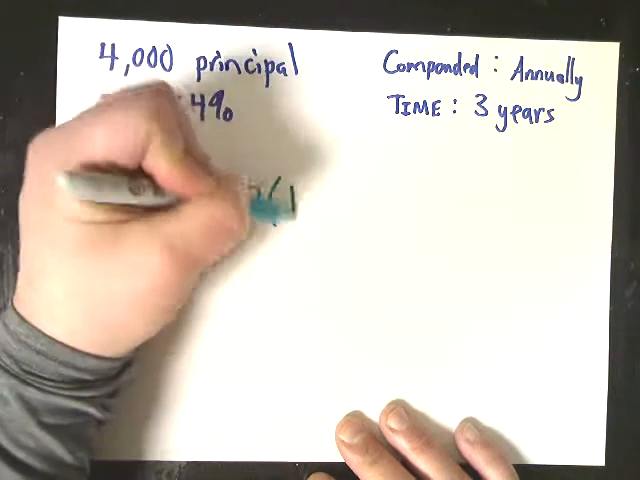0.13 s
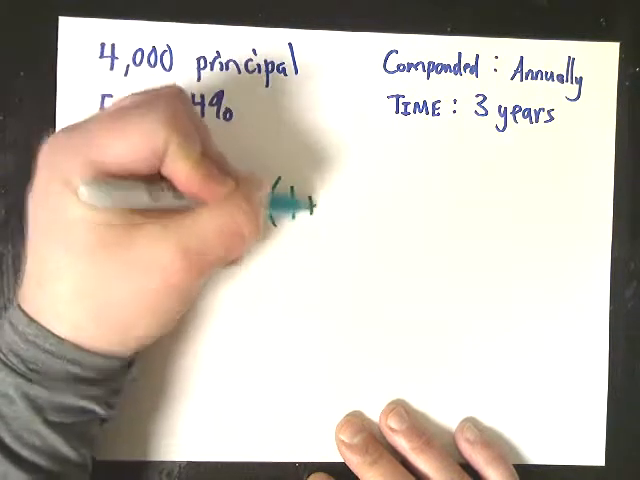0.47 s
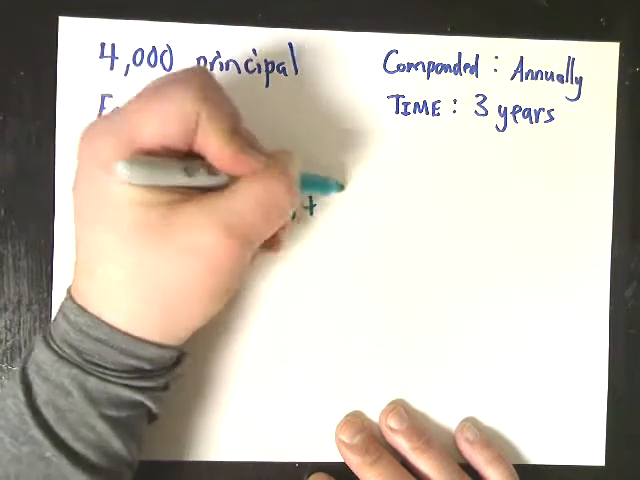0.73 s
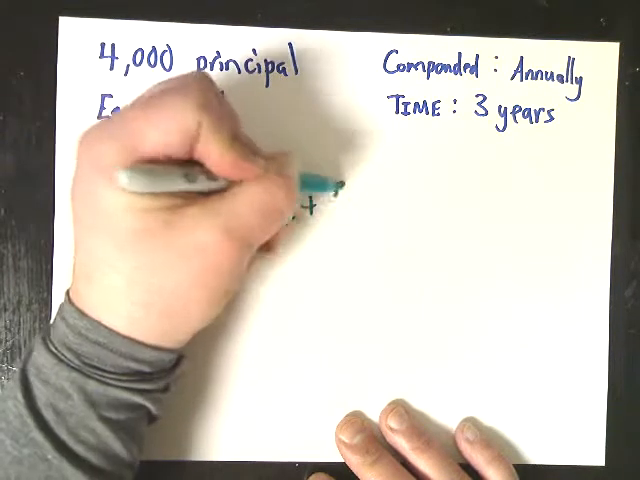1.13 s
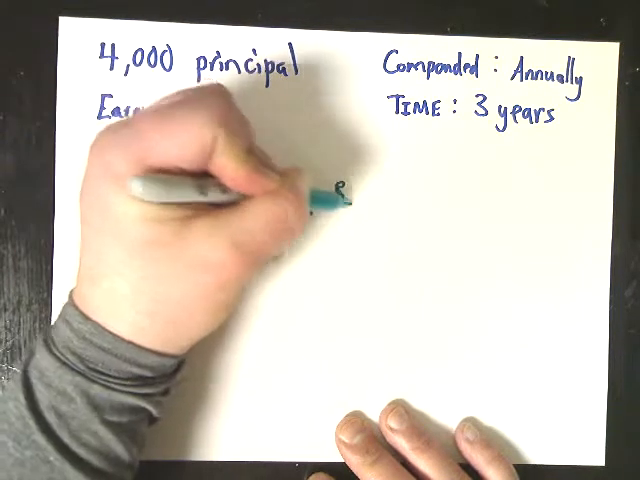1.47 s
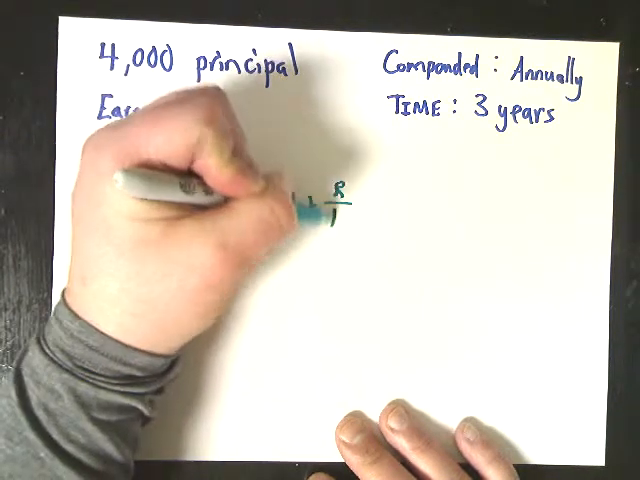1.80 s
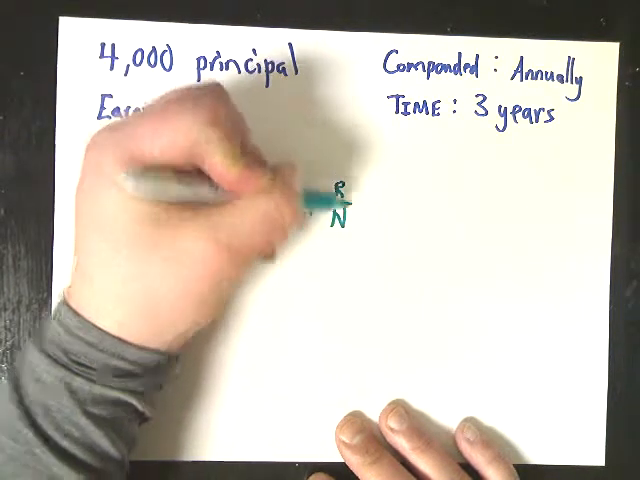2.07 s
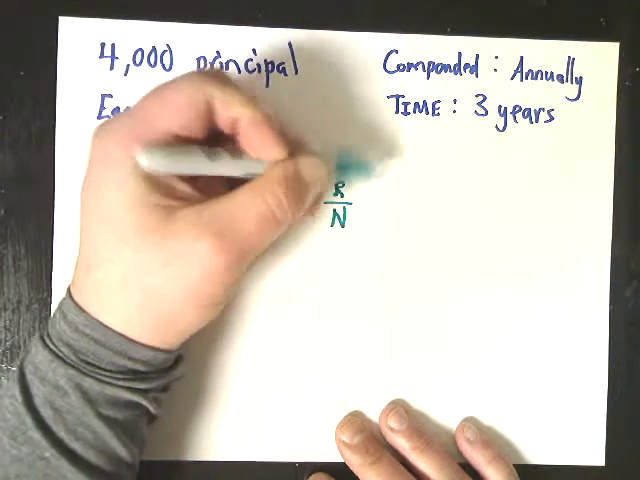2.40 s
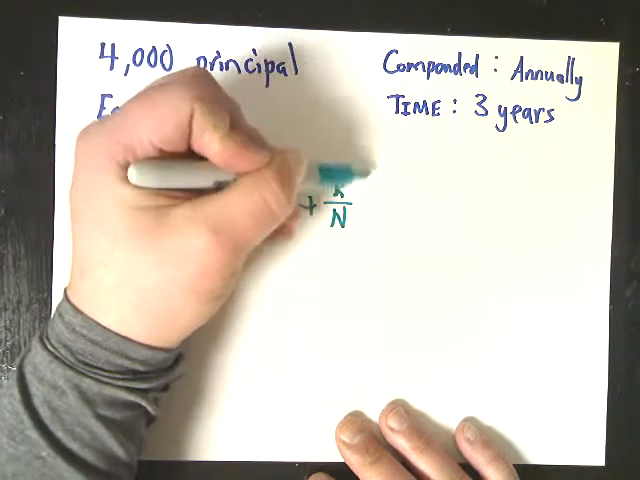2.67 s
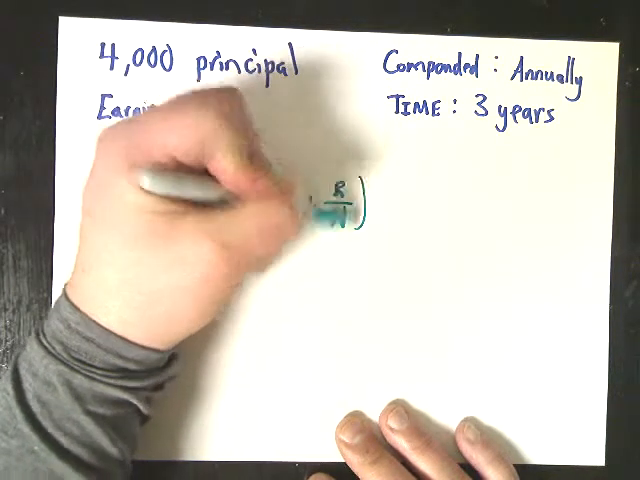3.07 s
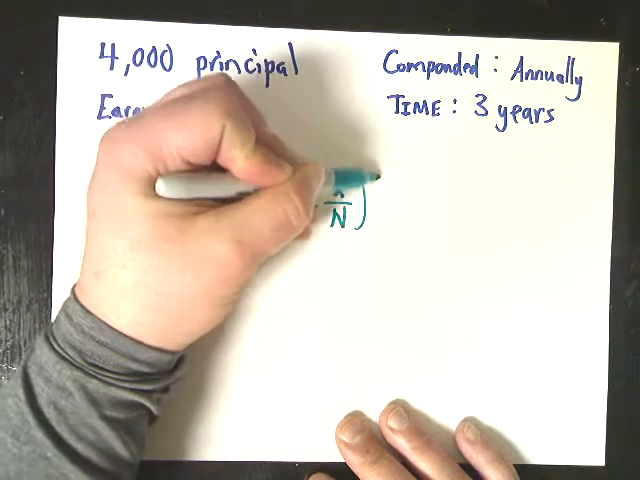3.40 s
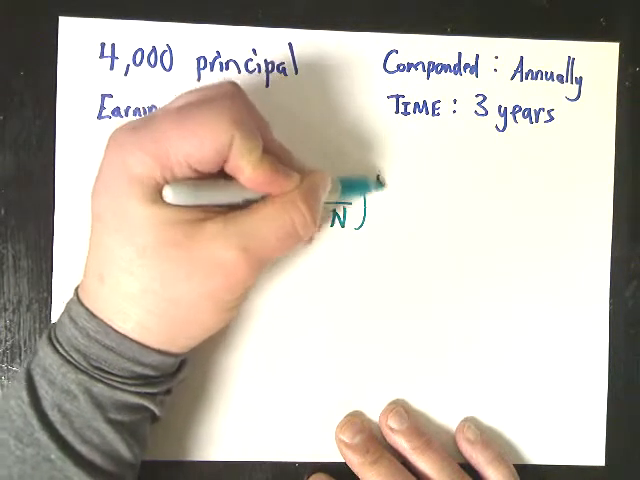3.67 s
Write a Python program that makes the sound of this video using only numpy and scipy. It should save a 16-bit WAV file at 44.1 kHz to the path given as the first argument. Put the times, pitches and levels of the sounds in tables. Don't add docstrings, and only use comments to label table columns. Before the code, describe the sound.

A felt marker scratches short dry strokes on paper in uneven clusters, with small tip taps, papery snaps and soft hand thuds on the desk; a quiet room, close cheap microphone, gritty hiss and faint hum throughout.

```python
import sys
import numpy as np
from scipy import signal
from scipy.fft import rfft, irfft, next_fast_len
from scipy.io import wavfile
from scipy.ndimage import map_coordinates

SR = 44100
rng = np.random.default_rng(int(sys.argv[2]) if len(sys.argv) > 2 else 0)


def unload_audio(sound):
    columns = np.transpose(np.atleast_2d(sound))
    steps = np.round(np.clip(columns, -1, 1) * 32767)
    wavfile.write(sys.argv[1], SR, steps.astype(np.int16))


def volts_from_decibels(level):
    exponent = np.asarray(level, float) / 20
    return 10 ** exponent


N = 169785


def unit(x):
    return x / np.sqrt(np.mean(x ** 2) + 1e-20)


def wobble(rate_hz):
    knots = rng.standard_normal(int(N * rate_hz / SR) + 4)
    return map_coordinates(knots, [np.arange(N) * rate_hz / SR])


def filtered(x, response):
    m = next_fast_len(len(x) + 8192)
    return irfft(rfft(x, m) * response(np.fft.rfftfreq(m, 1 / SR)), m)[:len(x)]


def colour(points):
    hz_points, db = np.transpose(points)
    return lambda hz: volts_from_decibels(np.interp(np.log(hz + 1), np.log(hz_points + 1), db, left=-120))


def coloured_noise(points):
    return unit(filtered(rng.standard_normal(N), colour(points)))


def level_curve(points):
    return np.interp(np.arange(N) / SR, *np.transpose(points))


def resonant(peaks, shift_db):
    def response(f):
        total = 0
        for k, (hz, width_hz, db) in enumerate(peaks):
            damping = 1j * f * width_hz
            total = total + (-1) ** k * volts_from_decibels(db + shift_db[k]) * damping / (hz * hz - f * f + damping)
        return total
    return response


def ring(modes, attack_s):
    t = np.arange(SR // 2) / SR
    total = np.zeros(len(t))
    for hz, db, t60_s in modes:
        total -= volts_from_decibels(db - 60 * t / t60_s) * np.sin(2 * np.pi * hz * t)
    return total * (1 - np.exp(-t / attack_s))


def add(track, s, sound):
    track[round((s + 1) * SR):][:len(sound)] += sound


def felt_on_fibres(count):
    fibres_per_s, fibre_db, clump_db = 11000, 1.8, 1.2
    caught = rng.random(count) < fibres_per_s / SR
    strength = rng.standard_normal(count) * volts_from_decibels(fibre_db * rng.exponential(size=count))
    return unit(caught * strength * volts_from_decibels(clump_db * wobble(300)[:count]))


def stroke_speed(t, length_s, rise):
    edge_power, drag_db, drag_s = 1.3, -18, 0.032
    u, top = t / length_s, np.clip(rise, .05, .95)
    ramp = np.clip(np.minimum(u / top, (1 - u) / (1 - top)), 0, 1)
    drag = np.clip(u / top, 0, 1) * np.exp(-np.maximum(t - length_s, 0) / drag_s)
    return np.sin(np.pi / 2 * ramp) ** edge_power + volts_from_decibels(drag_db) * drag


# (start [s], length [s], level [dB], rise [share of length], sheet over barrel [dB])
STROKES = [(-.03, 0.096, -56, 0.3, -18.5), (0.203, 0.079, -58, .5, -25), (0.348, .13, -67, 0.3, -6),
           (0.463, 0.14, -64, 0.4, -21.5), (0.771, 0.06, -63.5, .2, -8.5), (0.899, 0.12, -70, 0.2, 1),
           (0.995, .03, -65.5, 0.1, 0), (1.017, 0.039, -68, 0.5, -0.5), (1.09, 0.094, -60.5, .45, -0.5),
           (1.364, .11, -65.5, 0.3, -6), (1.596, 0.073, -58.5, 0.2, -24), (1.762, .103, -58.5, 0.8, -3.5),
           (1.893, 0.046, -54.5, 0.2, -13), (2.017, 0.13, -71, 0.93, -33), (2.136, .055, -65, 0.6, -12),
           (2.853, 0.1, -55.5, .45, -10.5), (3.196, 0.067, -77, 1, 6), (3.307, 0.064, -66.5, 0.2, -12),
           (3.515, .078, -61, .3, -9.5), (3.62, 0.06, -58, 0.18, -11)]
# (low barrel level [dB], high barrel level [dB])
GRIPS = [(4, 4.5), (2, 3.5), (-0.5, -2.5), (0, 0), (-7.5, 2.5), (-2, -11.5), (-11, 1), (2, 2), (-1, -1.5),
         (-4, -7.5), (-1.5, 1), (-2, -1), (-5, -1), (3, -11.5), (13, -8), (-2, 2), (8, -3.5), (1, 2.5),
         (5, 5), (1, 5)]
# (frequency [Hz], width [Hz], level [dB])
BARREL_PEAKS = [(2615, 220, -16), (3328, 310, -11), (4180, 440, -6.5), (4820, 200, -4), (5378, 200, -1.5),
                (5742, 260, -4), (6113, 320, -7), (6740, 300, -3), (6983, 250, -3.5), (7460, 280, -7.5)]
# (frequency [Hz], width [Hz], level [dB])
SHEET_PEAKS = [(675, 300, -1.5), (1146, 190, 2.5), (1416, 200, -0.5), (1792, 300, -5.5), (2575, 300, -9.5),
               (3372, 210, -7)]


def strokes():
    low_below_hz, high_above_hz = 4600, 5800
    track, t = np.zeros(N + 2 * SR), np.arange(SR // 4) / SR
    for (s, length_s, db, rise, sheet_db), (low_db, high_db) in zip(STROKES, GRIPS):
        fibres = felt_on_fibres(len(t))
        grip_db = [low_db if hz < low_below_hz else high_db if hz > high_above_hz else 0
                   for hz, _, _ in BARREL_PEAKS]
        barrel = unit(filtered(fibres, resonant(BARREL_PEAKS, grip_db)))
        sheet = unit(filtered(fibres, resonant(SHEET_PEAKS, np.zeros(len(SHEET_PEAKS)))))
        speed = stroke_speed(t, length_s, rise)
        add(track, s, volts_from_decibels(db) * speed * (barrel + volts_from_decibels(sheet_db) * sheet))
    return track[SR:SR + N]


# (time [s], tip tap [dB], desk knock [dB], hand thud [dB])
LANDINGS = [
    (.189, -46, -61, -60),
    (.405, -64, -70, -48),
    (.792, -50, -40.5, -36.5),
    (1.3248, -47.5, -62, -51.5),
    (1.578, -50.5, -55.5, -53.5),
    (3.068, -59.5, -57.5, -41.5),
]
# (frequency [Hz], level [dB], t60 [s])
TAP_MODES = [(401, -3.5, .025), (525, 1.5, .03), (668, -4, 0.028)]
# (frequency [Hz], level [dB], t60 [s])
KNOCK_MODES = [(233, -1, 0.04), (297, -1, .06), (741, -7.5, 0.046), (1170, -11, 0.013), (1680, -13, .015)]
# (frequency [Hz], level [dB], t60 [s])
THUD_MODES = [(38, -8.5, 0.14), (67.3, 0, .07), (131, -3.5, .06)]


def landings():
    track = np.zeros(N + 2 * SR)
    for s, tap_db, knock_db, thud_db in LANDINGS:
        add(track, s, volts_from_decibels(tap_db) * ring(TAP_MODES, 0.00014))
        add(track, s, volts_from_decibels(knock_db) * ring(KNOCK_MODES, .0006))
        add(track, s, volts_from_decibels(thud_db) * ring(THUD_MODES, 0.0011))
    return track[SR:SR + N]


# (time [s], peak level [dB], pitch [Hz])
SNAPS = [(0.195, -49, 5020), (0.261, -41, 4540), (0.285, -51, 4030), (.348, -36, 5850), (.457, -54, 3520),
         (.472, -40.5, 4800), (0.52, -54, 3600), (1.355, -46, 2900), (2.165, -42, 3200)]


def snaps():
    t60_s = .0016
    track = np.zeros(N + 2 * SR)
    for s, db, hz in SNAPS:
        modes = [(hz, 0, t60_s), (.75 * hz, -3, t60_s), (1.28 * hz, -3, t60_s)]
        add(track, s, volts_from_decibels(db) * ring(modes, .0001))
    return track[SR:SR + N]


# (time [s], level [dB])
RUB_LEVEL = [(0.06, -69), (0.26, -71.5), (0.41, -70), (0.57, -76.5), (0.86, -71), (1.11, -73.5),
             (1.45, -72.5), (1.59, -70), (1.78, -69), (2.0, -76.5), (2.25, -72), (2.36, -74), (2.55, -81),
             (2.79, -79.5), (3.1, -82.5), (3.23, -69), (3.41, -73.5), (3.78, -71.5)]
# (frequency [Hz], density [dB per Hz])
RUB_COLOUR = [(70, -29), (95, -5.5), (125, -1.5), (170, -4.5), (230, -8), (320, -31)]


def hand_rub():
    return volts_from_decibels(level_curve(RUB_LEVEL) + 3.0 + 3.5 * wobble(14)) * coloured_noise(RUB_COLOUR)


# (time [s], level [dB])
SWAY_LEVEL = [(0.1, -61), (0.18, -63), (0.48, -66.5), (0.75, -65.5), (1.02, -65), (1.43, -65),
              (1.66, -66.5), (2.03, -59), (2.15, -62), (2.28, -63), (2.54, -64), (2.82, -68), (3.35, -67),
              (3.48, -68), (3.64, -67), (3.75, -69)]
# (frequency [Hz], density [dB per Hz])
SWAY_COLOUR = [(3, -5), (15, -3.5), (30, 1), (60, -7), (110, -13.5), (200, -50)]


def desk_sway():
    return volts_from_decibels(level_curve(SWAY_LEVEL) + 3.0 + 2.2 * wobble(8)) * coloured_noise(SWAY_COLOUR)


# (frequency [Hz], rms level [dB])
MOTOR_HARMONICS = [(236.9, -79), (355.3, -77.5), (414.5, -82.5), (473.7, -80), (532.9, -83.5),
                   (769.8, -72.5), (888.2, -75), (1066, -84), (1125, -85), (1184, -87), (1244, -85.5),
                   (1303, -87)]


def motor_hum():
    t = np.arange(N) / SR
    hum = np.zeros(N)
    for hz, db in MOTOR_HARMONICS:
        level = volts_from_decibels(db + 2 + 1.3 * wobble(12))
        hum += level * np.sin(2 * np.pi * (hz * t + rng.random()) + .4 * wobble(6))
    return hum


# (frequency [Hz], density [dB per Hz])
AIR_COLOUR = [(90, -40), (170, -20), (230, -0.5), (520, -3.5), (800, -3), (1300, -11), (2200, -16),
              (7000, -25.5)]


def room_air():
    return volts_from_decibels(-63.5 + 1.1 * wobble(4) + 1.1 * wobble(118)) * coloured_noise(AIR_COLOUR)


def scene():
    writing = strokes() + landings() + snaps()
    background = hand_rub() + desk_sway() + motor_hum() + room_air()
    return (writing + background)[None]


# (frequency [Hz], gain [dB])
CAMERA_ROLL_OFF = [(100, 0), (6500, -1.5), (7200, -7), (7800, -11.5), (8300, -20), (8900, -40.5),
                   (9400, -37), (12000, -31.5)]


def converter(x):
    rate_hz, step = 16000, .00095
    stall_start_s, stall_end_s = 2.8793, 2.883
    slow = signal.resample_poly(x, 160, 441)
    steps = np.round(slow / step) * step
    steps[round(stall_start_s * rate_hz):round(stall_end_s * rate_hz)] = 0
    held = np.interp(np.arange(N) / SR, np.arange(len(steps)) / rate_hz, steps)
    roll_off = colour([(0, 0), *CAMERA_ROLL_OFF])
    return filtered(held, lambda hz: roll_off(hz) / np.sinc(np.minimum(hz, 9000) / rate_hz) ** 2)


def camera_electronics():
    offset, drift_db, whine_hz, whine_db = .0438, -76.5, 12101, -91.5
    whine = volts_from_decibels(whine_db) * np.sin(2 * np.pi * whine_hz * np.arange(N) / SR)
    return volts_from_decibels(drift_db) * wobble(25) + whine + offset


def low_pass(x):
    return signal.sosfilt(signal.butter(12, 15800, fs=SR, output="sos"), x)


def record(dry):
    mix = (converter(dry[0]) + camera_electronics())[None]
    return low_pass(mix)


dry = scene()
out = record(dry)
unload_audio(out)
```